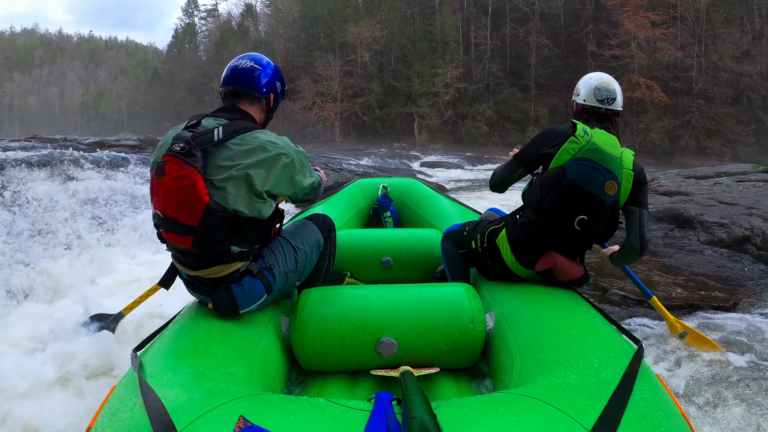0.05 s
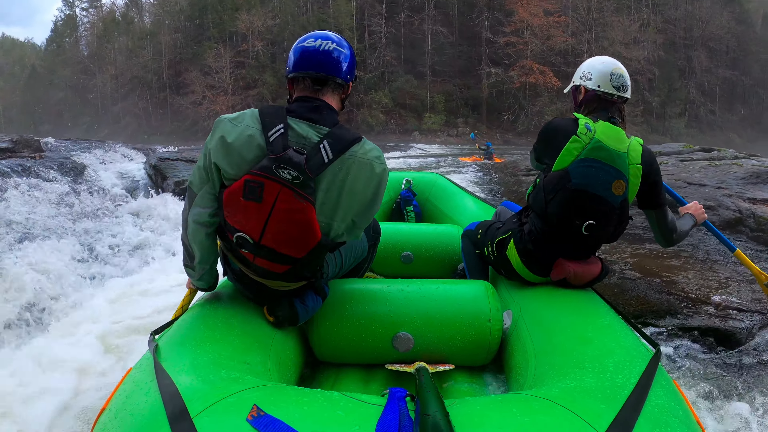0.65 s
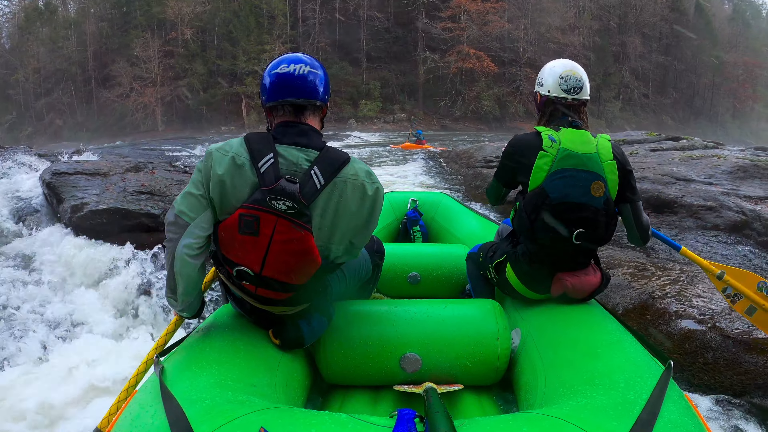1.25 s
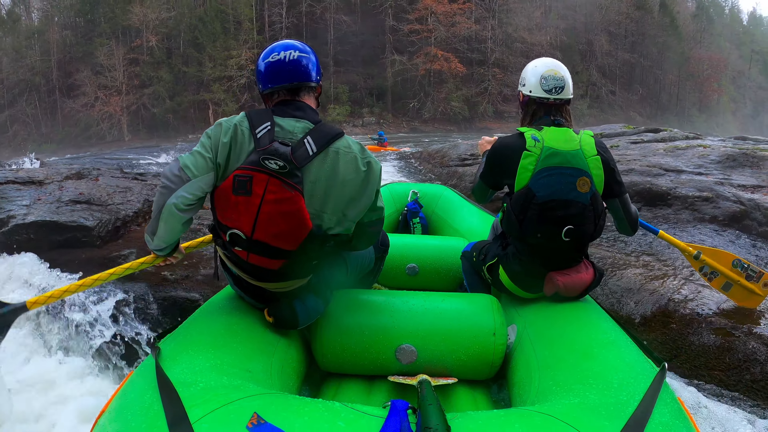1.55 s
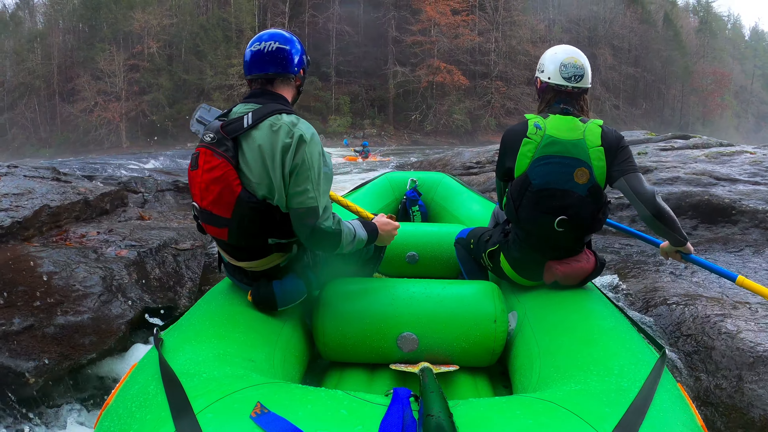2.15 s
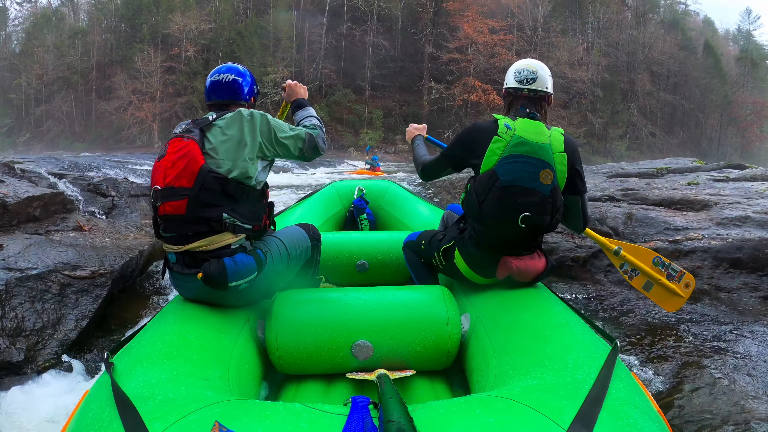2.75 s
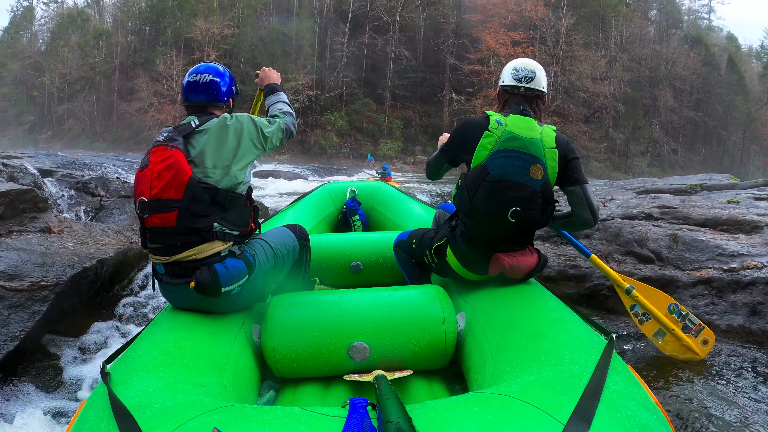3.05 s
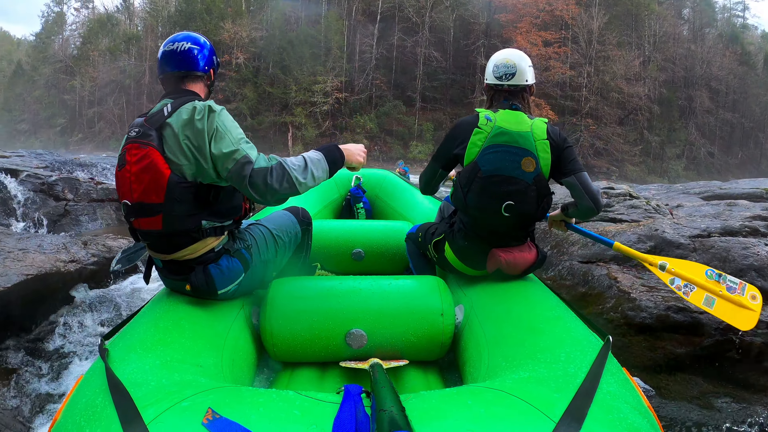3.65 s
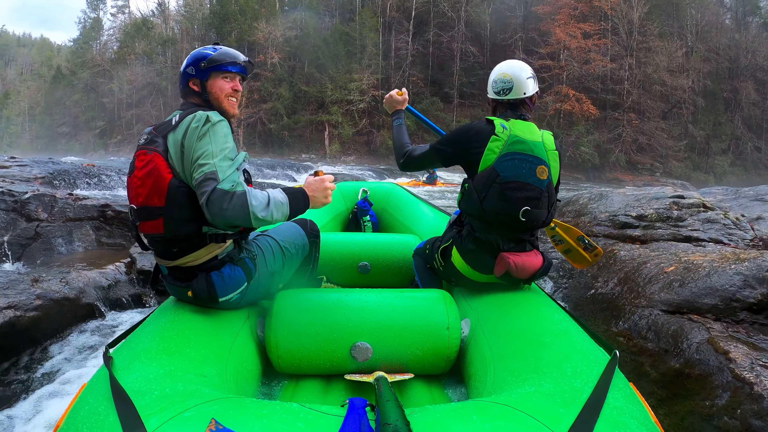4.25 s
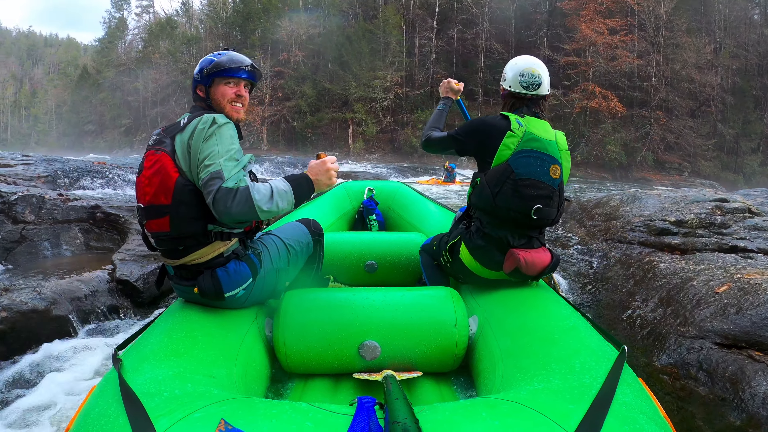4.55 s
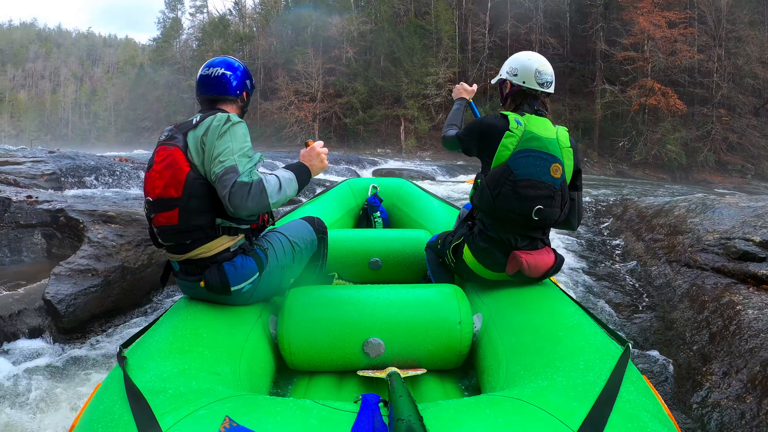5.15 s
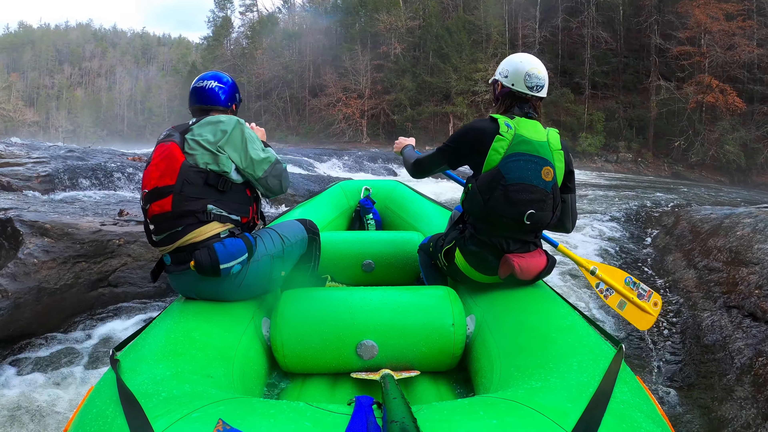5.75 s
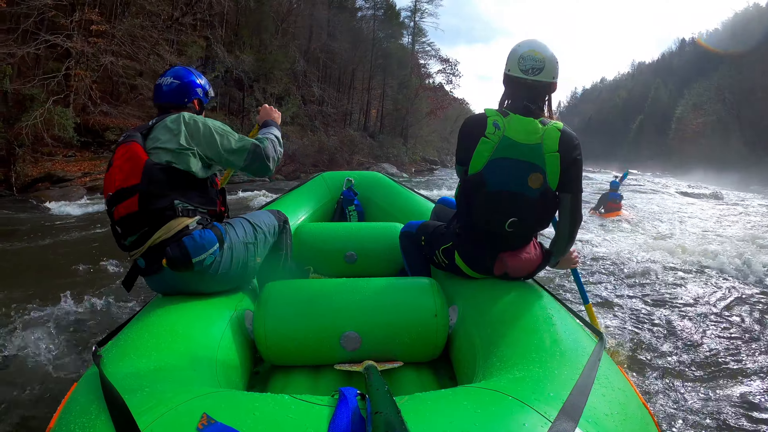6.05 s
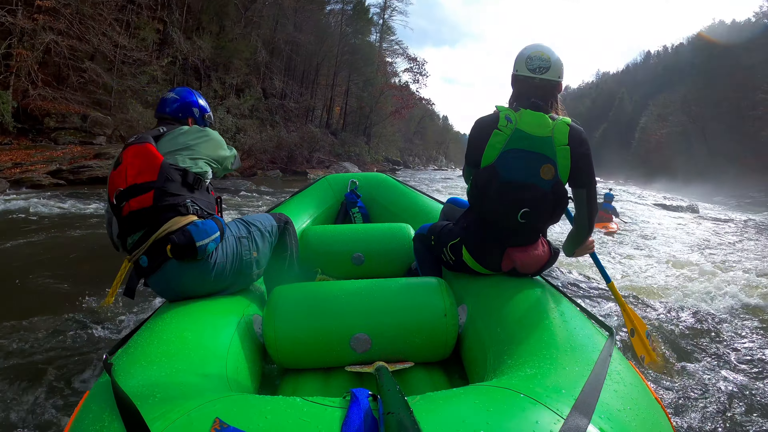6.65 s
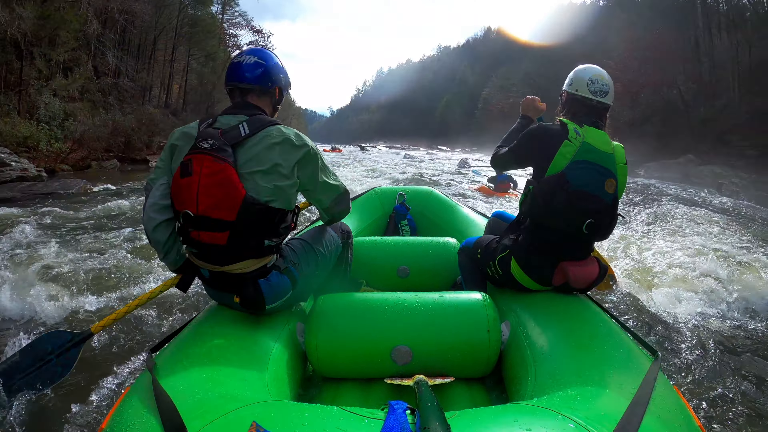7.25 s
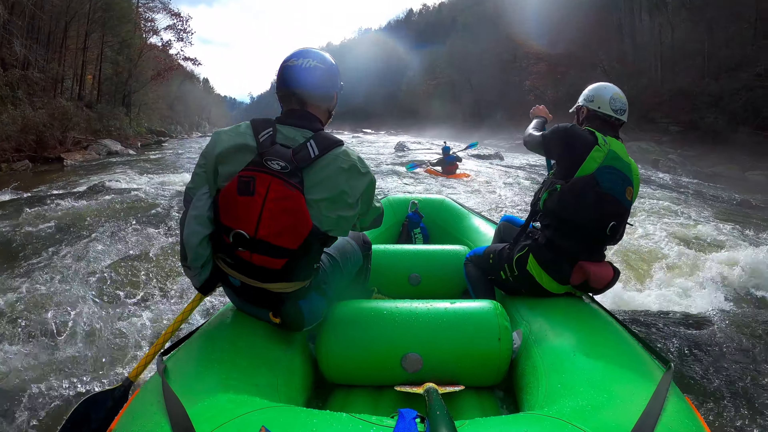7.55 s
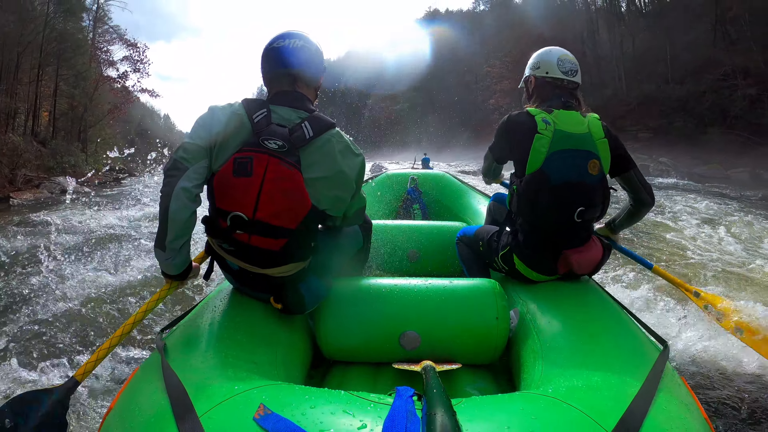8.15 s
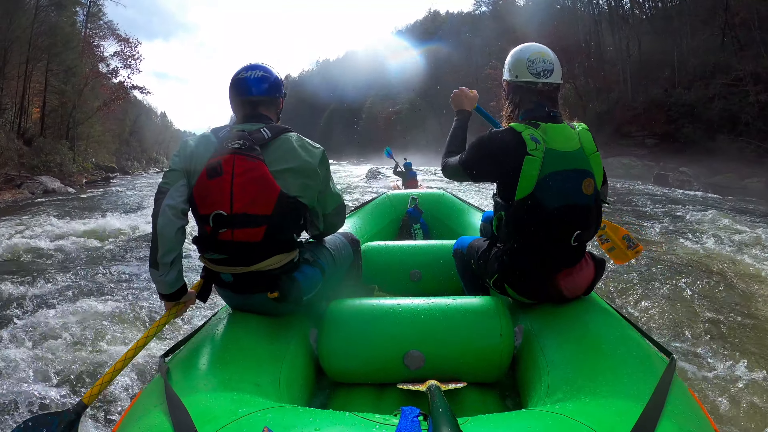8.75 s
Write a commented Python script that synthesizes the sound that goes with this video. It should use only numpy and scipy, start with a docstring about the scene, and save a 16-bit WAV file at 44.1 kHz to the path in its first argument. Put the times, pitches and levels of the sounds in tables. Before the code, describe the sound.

Muffled white water churns and tumbles continuously around a raft, whose hull rumbles and gurgles as waves heave against it. Short clusters of drops and plops hit the waterproof microphone housing around one second in and again near three seconds, followed by scattered taps and one sharp click. Toward the end, a heavier shower of spray patters right on the housing over the steady rush of the river.

```python
"""Big air pockets churn under a raft in a whitewater rapid, heard from a small waterproof housing on board.
The hull rumbles and its hollow gurgles, with the rush of white water all around and foam fizzing close by.
Right at the microphone, drops slap the housing, cavities plop shut and waves throw spray over it.
The housing wall muffles the treble and rings at a few pitches."""
import sys
import numpy as np
from scipy import signal
from scipy.fft import rfft, irfft
from scipy.io import wavfile
from scipy.ndimage import uniform_filter1d

SR = 44100
rng = np.random.default_rng(int(sys.argv[2]) if len(sys.argv) > 2 else 0)


def pcm_store(signal):
    """Save signal as 16-bit PCM."""
    levels = np.round(np.clip(np.atleast_2d(signal), -1, 1) * 32767)
    wavfile.write(sys.argv[1], SR, levels.astype(np.int16).T)


N = 392490
TIME = np.arange(N) / SR

# resonances of the wall around the microphone: pitch_hz, width_hz, lift_db
HOUSING = [(1444, 297, 10), (1920, 300, 6.5), (3106, 460, 11), (4980, 510, 7)]


def churn(level_db, spread_octaves, bandwidth, swell_db, tilt, count=16):
    """Air pockets folded under the water boom briefly; their sizes cluster around a wandering pitch."""
    # typical pocket, higher where the raft slides into open water: time_s, pitch_hz
    pocket_pitch = [(0, 215), (2.1, 187.6), (4.2, 183), (4.6, 215), (5.3, 195), (6.1, 240), (7.0, 323),
                    (7.9, 248), (8.3, 234), (8.6, 177), (8.9, 207)]
    pocket_hz, = in_time(pocket_pitch)
    out = np.zeros(N)
    for hz in np.geomspace(100, 400, count):
        share = hz ** tilt / np.sqrt(1 + (np.log2(hz / pocket_hz) / spread_octaves) ** 2)
        folds = grains(1500, spread_db=2.0)
        pockets = resonate(resonate(folds, hz, bandwidth * hz), hz, bandwidth * hz)
        out += rms_one(pockets) * share * from_db(swell_db * drift(3))
    return from_db(level_db) * steady(rms_one(lowpass(out, 620)), window_s=0.09)


def gurgle(trim_db, width_hz, wobble_octaves):
    """Collapsing bubbles ring the hollow under the hull: one resonance that glides and wobbles."""
    # the hollow, shifting as the raft rides the waves: time_s, pitch_hz, relative_db
    hollow = [(0, 261, -23.5), (0.6, 258, -26.5), (0.9, 265, -31), (1.3, 281, -20.5), (1.7, 260, -28),
              (1.9, 188, -23.5), (2.2, 184, -22), (2.5, 242, -25.5), (3.0, 235, -26), (3.4, 209, -23.5),
              (3.8, 263, -28.5), (4.6, 288, -23), (5.1, 230, -30), (5.7, 275, -23.5), (6.2, 300, -27.5),
              (6.7, 280, -27.5), (7.2, 315, -24), (7.65, 305, -28), (7.9, 214, -22.5), (8.2, 303, -24.5),
              (8.45, 246, -21.5), (8.6, 173, -38), (8.9, 196, -21)]
    hz, db = in_time(hollow)
    wobbling_hz = hz * 2 ** (wobble_octaves * drift(5))
    turn = np.exp(2j * np.pi * np.cumsum(wobbling_hz) / SR)  # carries the resonance along the pitch
    r = np.exp(-np.pi * width_hz / SR)
    ring = turn * signal.lfilter([1], [1, -2 * r, r * r], grains(1500, spread_db=1.5) / turn)
    return from_db(db + trim_db) * steady(rms_one(lowpass(ring.real, 520)), window_s=0.08)


def rush(level_db, tumble_db):
    """Countless mid-sized bubbles in the white water around the raft merge into a tumbling rush."""
    # spectrum of the bubbles: frequency_hz, relative_db
    colour = [(200, -16), (350, -4.5), (440, 1), (520, 0.5), (670, 0.43), (790, -3), (900, -7.5),
              (1000, -16.5), (1200, -33), (2000, -53.5), (8000, -112)]
    bubbles = grains(14000, spread_db=1.0) * from_db(tumble_db * drift(27))
    return from_db(level_db) * heard(bubbles, through_housing(colour))


def hull_rumble(sway_db, span_octaves, window_s):
    """The hull rumbles as the water sways it; each wave adds a swell of deep rumble."""
    # spectrum of the hull: frequency_hz, relative_db
    colour = [(10, -13.5), (22, -9), (42, -6.5), (80, -4.5), (115, -7.5), (170, -7.5), (260, -27.5),
              (700, -115)]
    # waves heaving against the hull: peak_s, level_db, half_length_s, pitch_hz
    heaves = [(0.062, -21.5, 0.084, 38), (0.33, -22.5, 0.15, 79), (0.76, -23, 0.098, 57.7),
              (1.35, -26.5, 0.33, 44.7), (2.646, -28.5, 0.21, 55.2), (4.097, -25.5, 0.19, 125.5),
              (5.5, -28.5, 0.21, 100.2), (6.879, -27.5, 0.18, 41.7), (7.395, -26, 0.11, 42),
              (7.75, -30.5, 0.12, 49.6), (8.187, -24, 0.07, 105), (8.532, -22, 0.079, 68)]
    ring = through_housing(colour)
    out = from_db(sway_db) * steady(heard(rng.standard_normal(N), ring), window_s)
    rumble = heard(rng.standard_normal(N), ring)
    for peak_s, db, half_s, hz in heaves:
        edges_hz = hz / 2 ** span_octaves, hz * 2 ** span_octaves
        wave = signal.sosfilt(signal.butter(2, edges_hz, "band", fs=SR, output="sos"), rumble)
        swell = np.exp(-((TIME - peak_s) / half_s) ** 2 / 2)
        out += from_db(db) * swell * steady(wave, window_s)
    return out


def drops(trim_db, splatter_s, bubble_db, bubble_q, wall_db, wall_width_hz, size=4096):
    """Each drop taps the housing, splatters and traps a ringing bubble; the wall rings on briefly."""
    # drops landing right at the microphone: start_s, relative_db, bubble_hz, splatter_db
    landings = [(0.421, -20.5, 4500, -0.5), (0.445, -28, 4900, -2), (0.537, -22.5, 1100, -7),
                (0.9779, -10.5, 3400, -20), (1.066, -32, 2450, -2.5), (1.098, -31.5, 3300, -2),
                (1.124, -31, 2600, -1), (1.1827, -27.5, 2500, 3), (1.212, -32, 4780, -7),
                (1.3484, -27.5, 1270, -4), (1.4094, -24.5, 4900, -2.5), (1.469, -31, 4930, -6),
                (2.1087, -30, 2600, -5), (2.2548, -26.5, 1340, -12), (2.339, -27, 2650, -4),
                (2.362, -29, 2710, -3), (2.658, -33, 4000, 0), (2.6868, -28, 1860, -4),
                (2.7213, -24, 2200, -1), (2.737, -25, 2540, -4), (2.7522, -25, 2520, 1),
                (2.772, -20, 2520, 2), (2.807, -29.5, 5000, -1), (2.9485, -28, 3550, 1),
                (2.9717, -26, 4600, -1), (3.7752, -27.5, 1830, -3), (3.95, -19, 4850, -6),
                (4.0248, -22.5, 4200, 8), (4.032, -23.5, 1870, 3), (4.042, -27, 4200, 6.5),
                (4.6574, -26.5, 1450, -8), (4.685, -26, 1890, -3), (5.3379, -17, 4870, -19.5),
                (5.7959, -27, 2670, -10), (6.7533, -27, 1920, -16), (6.988, -24, 4780, -5),
                (7.8185, -21, 1910, 3), (7.8343, -22, 1980, -1), (7.925, -26, 3200, -4),
                (8.0275, -25, 1400, -2), (8.3053, -30, 3340, -5), (8.3496, -26.5, 2430, -8),
                (8.379, -24, 2450, -1), (8.395, -21, 3600, -5), (8.403, -26.5, 3680, -2),
                (8.414, -24, 3660, -1), (8.4320, -25, 4800, -8), (8.4435, -24, 3100, -6),
                (8.4553, -17, 4700, -8), (8.465, -24, 3200, -5), (8.4953, -19, 2600, -5),
                (8.5044, -22, 4800, 2), (8.5218, -25, 5000, -9), (8.529, -18, 2020, -4),
                (8.5442, -17, 1290, -0.5), (8.5558, -20, 2700, 5), (8.566, -21, 3000, 3),
                (8.5865, -20, 3100, -2), (8.597, -22, 3100, 0), (8.6134, -23.5, 3660, -3),
                (8.632, -23.5, 2600, 0), (8.6598, -24, 2480, -3), (8.6667, -20, 4600, -6),
                (8.686, -22, 1140, -3), (8.7755, -25, 1900, -8)]
    # spectrum of a slap on the wall: frequency_hz, relative_db
    colour = [(200, -16.5), (600, 0), (1000, 10.5), (1250, -5), (1700, -4), (2400, -13), (3100, -16),
              (3800, -18), (4500, -28), (5400, -29), (6500, -43.5), (8500, -66.5)]
    force, age = np.zeros(N + size), np.arange(size) / SR
    for start_s, db, bubble_hz, splatter_db in landings:
        splatter = rng.standard_normal(size) * np.exp(-age / splatter_s)
        slap = from_db(splatter_db) * splatter / np.linalg.norm(splatter)
        slap[0] += 1  # the tap itself
        slap += from_db(bubble_db) * resonate(slap, bubble_hz, bubble_hz / bubble_q)
        at = round(start_s * SR)
        force[at:at + size] += from_db(db + trim_db) * slap
    force += from_db(wall_db) * sum(resonate(force, hz, wall_width_hz) for hz, _, _ in HOUSING)
    ring = through_housing(colour)
    return heard(force[:N], ring / np.abs(ring).max())


def plops(t60_s, rise_per_s, size=4096):
    """Water closes over a cavity, which rings for a moment, rising in pitch as it nears the surface."""
    # closing cavities: start_s, peak_db, pitch_hz
    cavities = [(0.537, -23, 910), (0.968, -23, 1035), (0.978, -20, 1156), (0.992, -24, 1050),
                (1.012, -20.5, 954), (2.735, -14.5, 900), (2.75, -20.5, 963), (2.769, -22.5, 1160),
                (7.816, -27, 905), (7.9242, -21, 924), (7.976, -20, 933), (8.502, -17, 1133),
                (8.596, -24, 1030), (8.64, -20, 1086)]
    out, age = np.zeros(N + size), np.arange(size) / SR
    for start_s, peak_db, hz in cavities:
        phase = 2 * np.pi * hz * age * (1 + rise_per_s * age / 2)
        at = round(start_s * SR)
        out[at:at + size] += from_db(peak_db - 60 * age / t60_s) * np.sin(phase)
    return lowpass(out[:N] + 1e-18, 1700)


def spray(trim_db, stray_db, stray_per_s, bubble_db, bubble_q, clump_db, count=16):
    """Showers and stray droplets patter on the housing in clumps; each leaves a tiny ringing bubble."""
    # showers that swell and die away: peak_s, relative_db, decay_s
    showers = [(0.43, -43.5, 0.03), (0.985, -39.5, 0.02), (1.119, -49.5, 0.12), (2.755, -40.5, 0.025),
               (2.95, -46.5, 0.07), (7.82, -38.5, 0.072), (8.022, -43.5, 0.15), (8.41, -38.5, 0.073),
               (8.551, -30.5, 0.085), (8.651, -35.5, 0.039)]
    # spectrum of the patter: frequency_hz, relative_db
    colour = [(200, -19.5), (600, -2.5), (950, 17), (1250, -2), (1700, -7.5), (2400, -10.5), (3100, -17.5),
              (3800, -18), (4500, -29), (5400, -30.5), (6500, -45), (8500, -73)]
    power = from_db(stray_db) ** 2
    for peak_s, db, decay_s in showers:
        rise_s = 0.96 * decay_s
        away = np.maximum((TIME - peak_s) / decay_s, (peak_s - TIME) / rise_s)
        power = power + (from_db(db) * np.exp(-away)) ** 2
    spray_db = 10 * np.log10(power)
    per_s = stray_per_s * from_db(0.97 * (spray_db - stray_db))  # a louder shower is also denser
    clumps = rms_one(from_db(clump_db * np.tanh(drift(65))))
    taps = grains(per_s, spread_db=4.5) * clumps * from_db(spray_db + trim_db)
    pitches_hz = np.geomspace(1150, 5400, count)
    pitch_index = rng.integers(0, count, N)
    bubbles = sum(resonate(taps * (pitch_index == k), hz, hz / bubble_q) for k, hz in enumerate(pitches_hz))
    return heard(taps + from_db(bubble_db) * bubbles, through_housing(colour))


def click():
    """A sudden step that relaxes: one dry, full-range click."""
    # the step: start_s, peak_db, fade_hz
    step = (5.8396, -14.5, 200)
    start_s, peak_db, fade_hz = step
    decay = np.exp(-2 * np.pi * fade_hz * np.abs(TIME - start_s))
    return from_db(peak_db) * (TIME >= start_s) * decay


def fizz(trim_db, flicker_db, splash_db):
    """Fine bubbles burst in the nearby foam, with sparser splashes closer to the microphone."""
    # strength of the foam: time_s, relative_db
    foam = [(0.0, -38), (0.85, -36), (2.0, -39.5), (3.3, -38), (5.0, -40.5), (7.0, -39.5), (8.0, -37),
            (8.5, -36), (8.9, -38)]
    # spectrum of the bursts: frequency_hz, relative_db
    colour = [(600, -30.5), (1000, 2), (1250, -2), (1700, -6), (2100, -14), (2500, -21.5), (3000, -16.5),
              (3600, -17.5), (4400, -29), (5400, -33.5), (6200, -42.5), (10000, -90.5)]
    foam_db, = in_time(foam)
    bursts = grains(12000, spread_db=1.5) * from_db(flicker_db * drift(18))
    splashes = from_db(splash_db) * grains(220 * from_db(3.0 * drift(0.93)), spread_db=0.5)
    return from_db(foam_db + trim_db) * heard(bursts + splashes, through_housing(colour))


def through_housing(colour, size=4096):
    """Impulse response of a source spectrum heard from inside the housing, with unit energy."""
    hz = np.maximum(np.arange(size // 2 + 1) * SR / size, 1)
    points_hz, points_db = np.transpose(colour)
    db = np.interp(np.log(hz), np.log(points_hz), points_db)
    for centre_hz, width_hz, lift_db in HOUSING:
        db += lift_db / (1 + (2 * (hz - centre_hz) / width_hz) ** 2)
    cepstrum = irfft(np.log(from_db(db)))
    cepstrum[1:size // 2] *= 2  # minimum phase: nothing rings before its cause
    cepstrum[size // 2 + 1:] = 0
    ring = irfft(np.exp(rfft(cepstrum)))
    return ring / np.linalg.norm(ring)


def heard(x, ring):
    """Pass a sound through an impulse response."""
    return signal.fftconvolve(x, ring)[:N]


def grains(per_s, spread_db):
    """Random tiny impacts of uneven size, with unit power at any rate."""
    sizes = from_db(spread_db * np.minimum(rng.exponential(1, N), 4)) * rng.choice([-1, 1], N)
    return rms_one(sizes * (rng.random(N) < per_s / SR) / np.sqrt(per_s))


def drift(rate_hz, hop=40, settle=2000):
    """A smooth random wander of about unit rms."""
    r = np.exp(-2 * np.pi * rate_hz * hop / SR)
    noise = rng.standard_normal(N // hop + settle + 2)
    slow = signal.lfilter([1], [1, -2 * r, r * r], noise)[settle:]
    return np.interp(np.arange(N) / hop, np.arange(len(slow)), rms_one(slow))


def resonate(x, hz, width_hz):
    """Two-pole resonance with gain 1 at its peak."""
    r = np.exp(-np.pi * width_hz / SR)
    feedback = [1, -2 * r * np.cos(2 * np.pi * hz / SR), r * r]
    return signal.lfilter(np.array([1, 0, -1]) * (1 - r * r) / 2, feedback, x + 1e-18)


def lowpass(x, hz):
    """Muffle a sound above hz."""
    return signal.sosfilt(signal.butter(4, hz, fs=SR, output="sos"), x)


def steady(x, window_s):
    """Even out the slow chance swells of a texture, to unit rms."""
    return x / np.sqrt(np.maximum(uniform_filter1d(x ** 2, int(window_s * SR)), 1e-9))


def in_time(rows):
    """Each column of a curve table at every sample."""
    time_s, *columns = np.transpose(rows)
    return [np.interp(TIME, time_s, column) for column in columns]


def from_db(db):
    """Decibels to gain."""
    return 10 ** (np.asarray(db) / 20)


def rms_one(x):
    """Scale to unit rms."""
    return x / np.sqrt(np.mean(x ** 2) + 1e-20)


def scene():
    """The river all around and the water that lands on the housing, at one microphone on board."""
    # strength of the churning under the raft: time_s, relative_db
    churning = [(0.0, -19.5), (1.25, -17.5), (1.55, -19.0), (2.2, -16.5), (3.0, -20), (3.5, -18),
                (4.15, -21), (4.55, -19.0), (6.1, -22), (6.55, -23.5), (7.9, -20.5), (8.9, -20.5)]
    # strength of the white water: time_s, relative_db
    rushing = [(0.0, -24), (0.4, -23), (1.8, -23.5), (3.0, -25.5), (3.5, -23.5), (4.5, -24.5), (5.9, -26),
               (6.6, -23.5), (7.0, -24), (7.9, -22.5), (8.9, -24.5)]
    churn_db, = in_time(churning)
    rush_db, = in_time(rushing)
    sway_db = -28 + 0.37 * (churn_db + 19)  # harder churning sways the hull more
    hull = hull_rumble(sway_db, span_octaves=0.6, window_s=0.097)
    pockets = churn(churn_db - 1.8, spread_octaves=0.89, bandwidth=0.22, swell_db=2.1, tilt=0.41)
    hollow = gurgle(trim_db=-0.5, width_hz=80, wobble_octaves=0.06)
    white_water = rush(rush_db + 0.85, tumble_db=0.47)
    foam = fizz(trim_db=-0.43, flicker_db=0.95, splash_db=-13.5)
    patter = spray(trim_db=3.5, stray_db=-63, stray_per_s=76, bubble_db=12.5, bubble_q=11, clump_db=3.5)
    slaps = drops(trim_db=2.5, splatter_s=0.0034, bubble_db=4.5, bubble_q=8, wall_db=-8, wall_width_hz=31)
    cavities = plops(t60_s=0.055, rise_per_s=1.7)
    return (pockets + hollow + white_water + hull + slaps + cavities + patter + click() + foam)[None]


def record(dry):
    """The recorder cuts the bass below 14 Hz and the treble above 16 kHz."""
    bass_cut = signal.sosfilt(signal.butter(2, 14, "high", fs=SR, output="sos"), dry)
    return signal.sosfilt(signal.ellip(10, .1, 80, 16000, fs=SR, output="sos"), bass_cut)


dry = scene()
out = record(dry)
pcm_store(out)
```